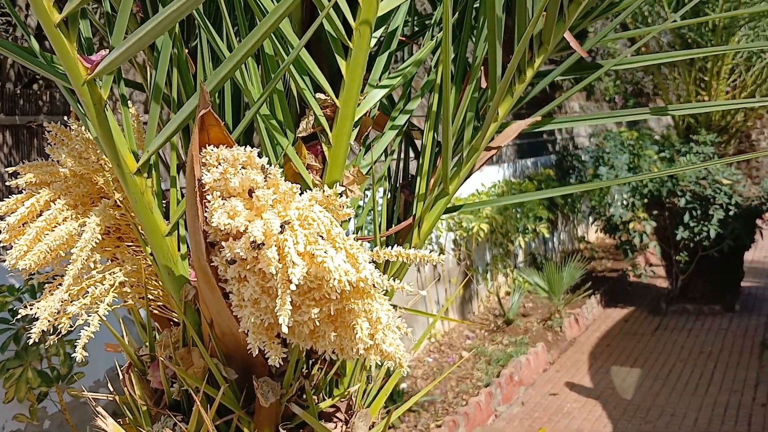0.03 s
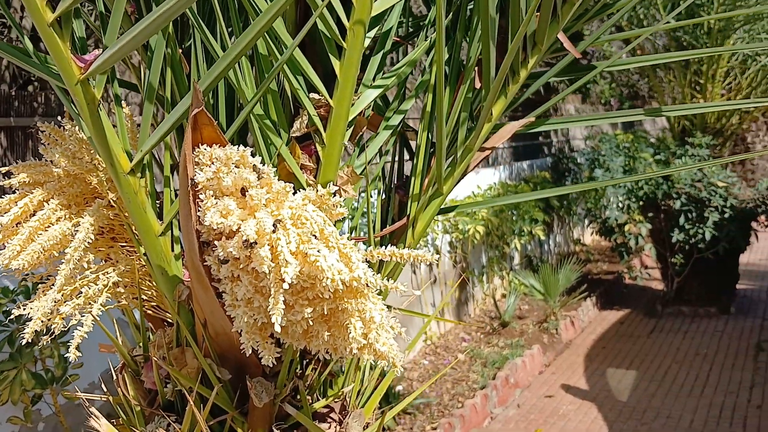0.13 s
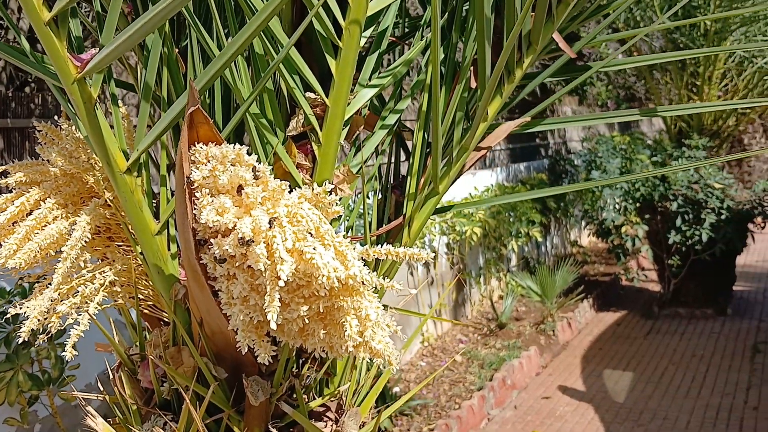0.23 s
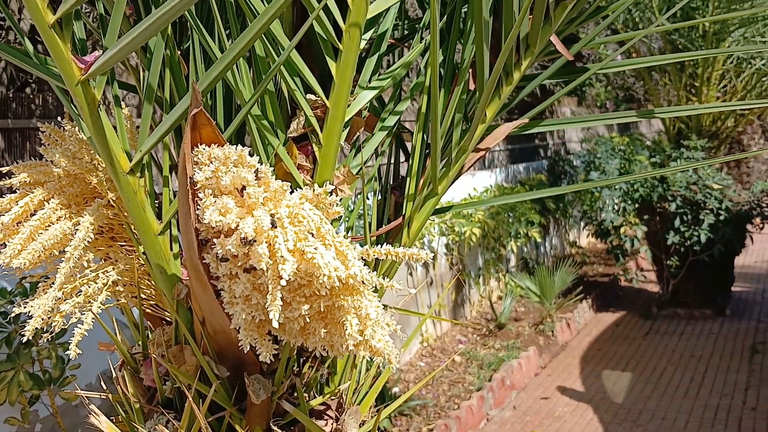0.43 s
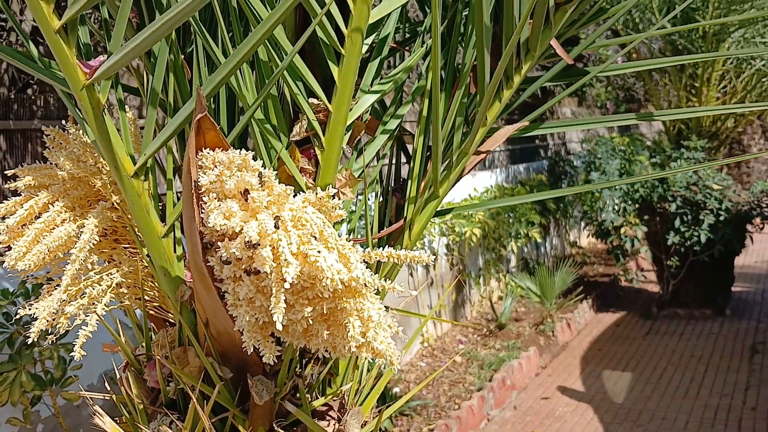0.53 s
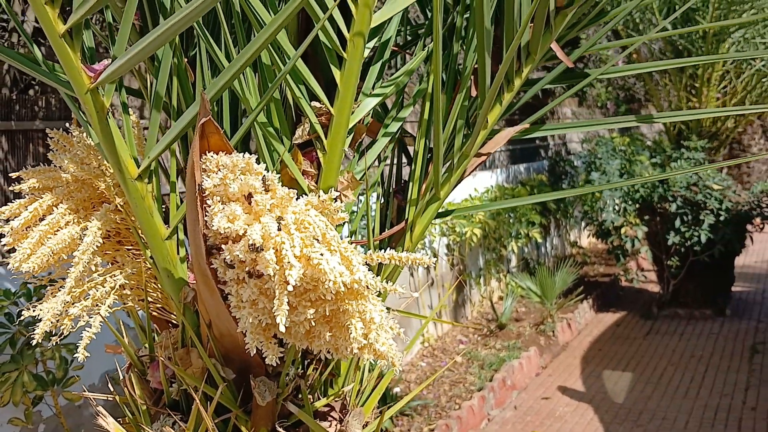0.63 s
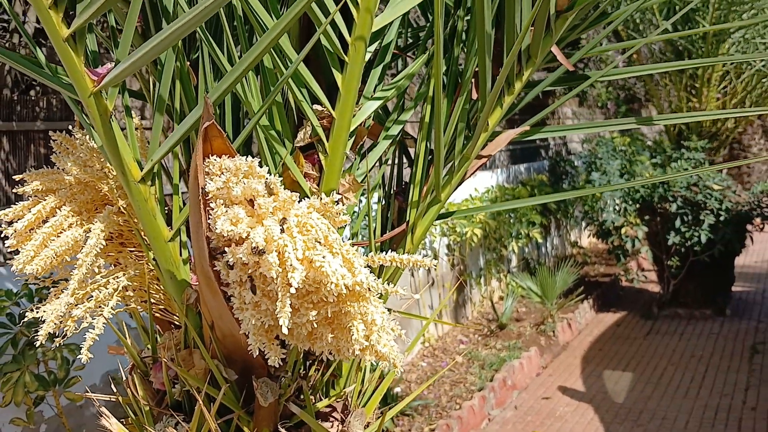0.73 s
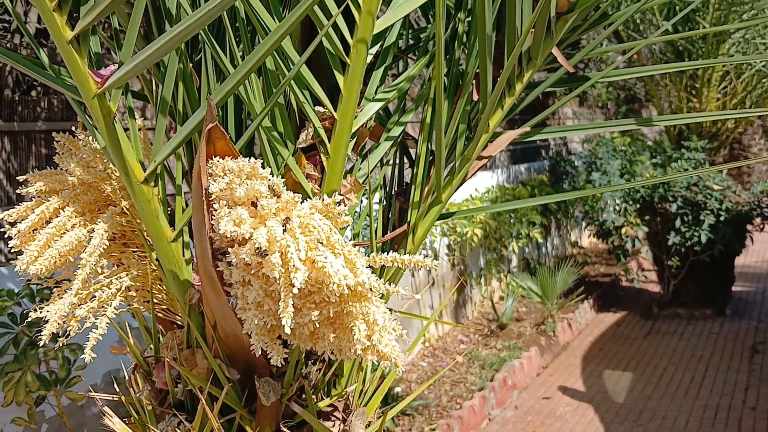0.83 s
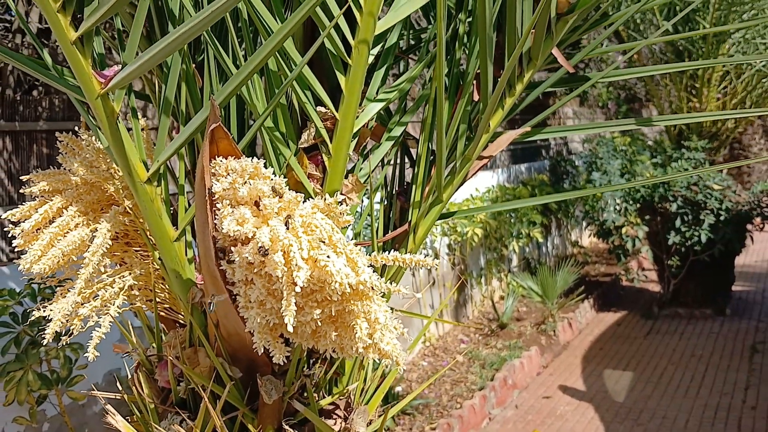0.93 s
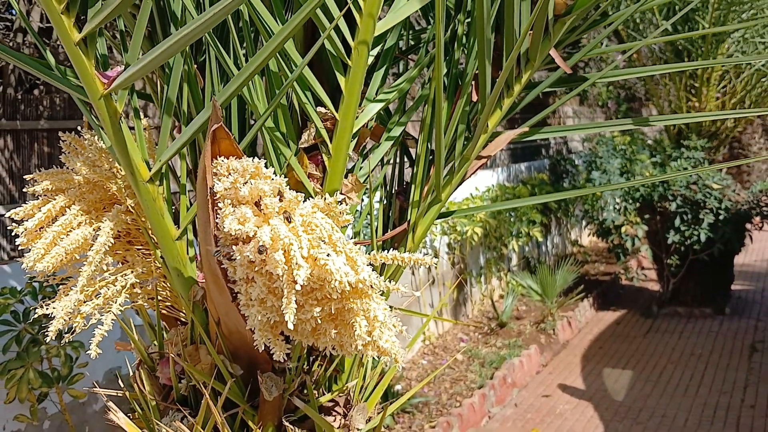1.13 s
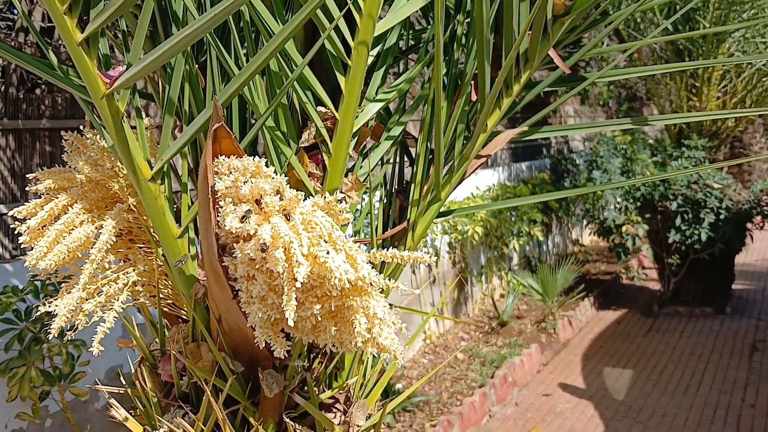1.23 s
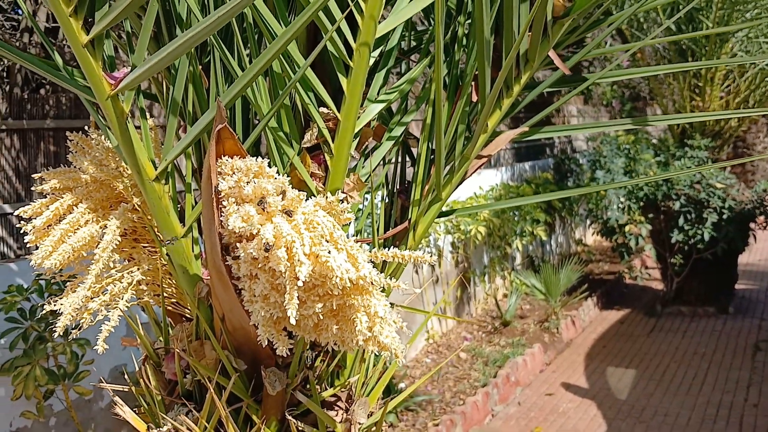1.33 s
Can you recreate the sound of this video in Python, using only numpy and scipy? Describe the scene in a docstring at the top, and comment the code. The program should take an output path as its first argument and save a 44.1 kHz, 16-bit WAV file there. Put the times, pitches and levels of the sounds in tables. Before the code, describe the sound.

Close bee buzz swells, bumps the microphone and fades into a faint outdoor hush.

```python
"""Over a faint outdoor hush and a low rumble, a bee hovers beside palm flowers, its wingbeats giving
a stack of harmonics and a pulsing hiss. It brushes past the left microphone port: the wake swells,
the wing tips tick on the casing, then eddies of downwash bump the port. The buzz drops in pitch and
fades as the bee flies off, and the hush slowly dies down over the rumble."""
import sys
import numpy as np
from scipy import signal
from scipy.fft import rfft, irfft
from scipy.io import wavfile

SR = 44100
rng = np.random.default_rng(int(sys.argv[2]) if len(sys.argv) > 2 else 0)


def dump(signal):
    """Clip the signal to [-1, 1] and save it as 16-bit WAV at the path in sys.argv[1]."""
    limited = np.clip(np.atleast_2d(signal).T, -1, 1)
    pcm = np.round(limited * 32767).astype(np.int16)
    wavfile.write(sys.argv[1], SR, pcm)


N = 61739
T = np.arange(N) / SR


def undb(db):
    """Decibels to gain."""
    return 10 ** (np.asarray(db) / 20)


def curve(rows):
    """Automation: straight lines through (t/s, value) rows."""
    return np.interp(T, *np.array(rows, float).T)


def noise(rows, column=1):
    """Noise shaped by a table: f/Hz first, density/(dB per Hz) in the chosen column."""
    rows = np.array(rows, float)
    hz = np.maximum(np.arange(N // 2 + 1) * SR / N, 1)
    db = np.interp(np.log(hz), np.log(rows[:, 0]), rows[:, column])
    return irfft(rfft(rng.standard_normal(N)) * undb(db), N) * np.sqrt(SR / 2)


def unit(x):
    """Scale to a spread of 1."""
    return x / np.std(x)


def drift(rate):
    """Smooth random modulator, spread 1, that changes about rate times a second."""
    hz = np.arange(N // 2 + 1) * SR / N
    return unit(irfft(rfft(rng.standard_normal(N)) * np.exp(-(2 * hz / rate) ** 2), N))


def swell(at_s, half_s):
    """Bell-shaped envelope that peaks at 1."""
    return np.exp(-((T - at_s) / half_s) ** 2)


def closeness():
    """Rises to 1 as the bee slips past the port."""
    return swell(at_s=0.317, half_s=0.061)


# Dark hush and thin high hiss: f/Hz, left density/(dB per Hz), right density/(dB per Hz)
HUSH_SPECTRUM = [(147, -79.5, -85.5), (314, -90, -88), (640, -95, -91.5), (1050, -97.5, -91.5),
                 (1250, -103, -95.5), (2167, -110, -93), (3120, -118, -110), (4270, -128, -126),
                 (9000, -145, -145)]
HISS_SPECTRUM = [(1490, -130, -130), (3300, -117, -118), (4740, -115, -118), (6350, -114, -111),
                 (6800, -112, -108), (7980, -109, -106), (8530, -117, -114), (10900, -116, -116),
                 (15500, -119, -115)]
# Their fader rides: t/s, level/dB
HUSH_FADER = [(0, 5), (.1, 4.5), (.3, 2.5), (.43, 5.5), (.62, 2), (.9, -1), (1.02, 0.5), (1.15, -6),
              (1.25, -7.5), (1.34, -11), (1.4, -9.5)]
HISS_FADER = [(0, 9), (.04, 10), (.25, 6), (.45, 5.5), (.62, 1), (.9, -1), (1.02, 1.5), (1.1, -2),
              (1.22, -2), (1.33, -8.5), (1.4, -7)]
# Low rumble: f/Hz, left density/(dB per Hz)
RUMBLE_SPECTRUM = [(15, -120), (28, -93), (42, -84), (63, -69.5), (85, -75.5), (125, -73.5), (180, -82),
                   (250, -86.5), (350, -95.5), (600, -105), (1500, -125), (4000, -160)]


def outdoors():
    """The bed: hush and hiss slowly die down over a steady rumble, unrelated at the two ports."""
    hush = np.array([noise(HUSH_SPECTRUM), noise(HUSH_SPECTRUM, column=2)])
    hiss = np.array([noise(HISS_SPECTRUM), noise(HISS_SPECTRUM, column=2)])
    rumble = np.array([noise(RUMBLE_SPECTRUM), undb(3) * noise(RUMBLE_SPECTRUM)])
    return hush * undb(curve(HUSH_FADER)) + hiss * undb(curve(HISS_FADER)) + rumble


# Wingbeat pitch: t/s, f/Hz
WINGBEAT_PITCH = [(0, 235), (.04, 230.2), (.08, 229.5), (.115, 219.4), (.145, 214.4), (.19, 221),
                  (.225, 220.6), (.27, 229), (.31, 231.5), (.385, 237.1), (.43, 236.4), (.48, 230.9),
                  (.54, 219.9), (.62, 207.7)]


def wingbeats():
    """Running count of slightly jittery wing strokes; it keeps buzz, air and ticks in step."""
    jitter = 1 + 0.0052 * drift(80)
    cycles = np.cumsum(curve(WINGBEAT_PITCH) * jitter) / SR
    return cycles - np.interp(0.32, T, cycles)  # a stroke starts at 0.32 s


# Wing tone, a row per harmonic from the first up: hovering level/dB, passing level/dB, leaving level/dB
WING_HARMONICS = [(-1.5, -1, 3), (-8.5, -5, 2.5), (-23.5, -23, -14.5), (-24.5, -26, -19),
                  (-21, -25.5, -10.5), (-32.5, -36, -28), (-33.5, -40.5, -23), (-35.5, -42.5, -26),
                  (-34, -40, -24), (-45, -40, -26), (-47, -41.5, -35), (-44, -50, -36), (-45, -53, -37)]
# Fader on the whole buzz, following the bee's nearness to the left port: t/s, level/dB
BUZZ_FADER = [(0, -44.5), (.035, -33.5), (.07, -25.5), (.11, -25.5), (.15, -27), (.215, -25.5),
              (.25, -23.5), (.288, -18), (.308, -23), (.355, -21.5), (.40, -29.5), (.45, -38.5),
              (.48, -48.5), (.53, -53), (.6, -62.5), (.68, -82)]


def buzz(cycles):
    """Wingbeat harmonics; their balance shifts as the bee turns and flutters most at close range."""
    aspect_s = [0.18, 0.27, 0.36, 0.5]  # the bee turns from hover to pass, holds, then turns to leave
    flutter_hz, flutter_db, close_flutter_db = 47.2, 2.5, 2
    surge_db = 12.5 * swell(at_s=0.3205, half_s=0.0075)
    tone = 0
    for k, (hover, passing, leave) in enumerate(WING_HARMONICS, 1):
        db = np.interp(T, aspect_s, [hover, passing, passing, leave])
        if k <= 2:  # the two lowest harmonics surge right at the port
            db += surge_db / np.sqrt(k) + flutter_db * drift(flutter_hz)
            phase = 0
        else:  # the upper ones waver against the wingbeat
            db += (flutter_db + close_flutter_db * closeness()) * drift(flutter_hz)
            phase = rng.random() + 0.084 * drift(flutter_hz)
        tone -= undb(db) * np.sin(2 * np.pi * (k * cycles + phase))
    return np.sqrt(2) * tone * undb(curve(BUZZ_FADER))


# Breathy air off the wings and the bright fizz of the hover: f/Hz, density/(dB per Hz)
AIR_SPECTRUM = [(100, -73.5), (400, -83.5), (900, -102), (1500, -96.5), (2400, -96), (3300, -99.5),
                (5500, -100), (7700, -100.5), (8600, -103), (11000, -101), (15500, -101)]
FIZZ_SPECTRUM = [(4000, -125), (6500, -105), (8500, -110), (10500, -100), (13000, -93), (15500, -93)]
# Their fader rides: t/s, level/dB
AIR_FADER = [(0, -6), (.07, -1.5), (.12, 2), (.23, 1), (.28, 2.5), (.35, 4.5), (.43, -2), (.5, -9),
             (.62, -22)]
FIZZ_FADER = [(0, -23), (.07, -2), (.125, -2), (.225, 1), (.27, -3), (.35, -14), (.5, -25), (.6, -45)]


def wing_air(cycles, pulse_depth=0.43):
    """Air off the wings hisses and fizzes, swelling once in each wingbeat."""
    air = noise(AIR_SPECTRUM) * undb(curve(AIR_FADER))
    fizz = noise(FIZZ_SPECTRUM) * undb(curve(FIZZ_FADER))
    return (air + fizz) * (1 - pulse_depth * np.cos(2 * np.pi * cycles))


# Wind of the wake at its peak: f/Hz, density/(dB per Hz)
WAKE_SPECTRUM = [(30, -84), (70, -67), (300, -60.5), (600, -63), (1000, -68.5), (1500, -86), (2400, -88),
                 (3500, -100), (8000, -135)]


def wake():
    """The bee's wake blows on the port: one soft whoosh around the close pass."""
    return noise(WAKE_SPECTRUM) * closeness()


# Crisp scratch of wing tips on the casing: f/Hz, density/(dB per Hz)
TICK_SPECTRUM = [(800, -81), (2000, -79.5), (3200, -84.5), (4500, -81.5), (7500, -89.5), (9000, -95),
                 (15500, -91)]


def wing_ticks(cycles):
    """One tick for each beat while the wing tips reach the casing."""
    start_s, attack_s, end_s, release_s = 0.2848, 0.0079, 0.314, 0.0019
    fade_in = np.clip((T - start_s) / attack_s, 0, 1)
    fade_out = np.clip((end_s - T) / release_s + 1, 0, 1)
    ticks = unit(np.exp(-(cycles % 1) / 0.15))  # decay time: 0.15 of a beat
    return noise(TICK_SPECTRUM) * fade_in * fade_out * ticks


# Eddies of downwash on the port: t/s, half length/s, f/Hz, level/dB
EDDY_BUMPS = [(0.315, 0.0066, 339, -19), (.328, .008, 150, -10.5), (.341, 0.0086, 105, -20.5),
              (.432, 0.0092, 110, -31), (.445, 0.012, 204, -27.5)]
# Tone colour of the swirl inside them: f/Hz, relative level/dB
SWIRL_COLOUR = [(25, -27), (45, -17), (75, 19.5), (400, 7.5), (600, -1), (1000, -17.5), (1600, -17.5),
                (4000, -58)]


def downwash(pitch_wander=0.107, swirl_db=-9):
    """Low bumps: each eddy swings the pressure about a peak at its centre, with finer swirl on top."""
    bumps = 0
    for at_s, half_s, hz, db in EDDY_BUMPS:
        turns = np.cumsum(hz * (1 + pitch_wander * drift(190))) / SR
        swing = np.sqrt(2) * np.cos(2 * np.pi * (turns - np.interp(at_s, T, turns)))
        swirl = undb(swirl_db) * unit(noise(SWIRL_COLOUR))
        bumps += undb(db) * swell(at_s, half_s) * (swing + swirl)
    return bumps


def scene():
    """The mix: the bee is so close to the left port that the right one barely hears it."""
    cycles = wingbeats()
    bee = buzz(cycles) + wing_air(cycles) + wing_ticks(cycles)
    left = bee + wake() + downwash()
    right = undb(-46) * bee
    return np.array([left, right]) + outdoors()


def record(dry):
    """The microphone drops the deepest bass; the recorder cuts the top."""
    low_cut = signal.butter(3, 41, "high", fs=SR, output="sos")
    high_cut = signal.ellip(10, .1, 80, 15800, fs=SR, output="sos")
    return signal.sosfilt(high_cut, signal.sosfilt(low_cut, dry))


dry = scene()
out = record(dry)
dump(out)
```